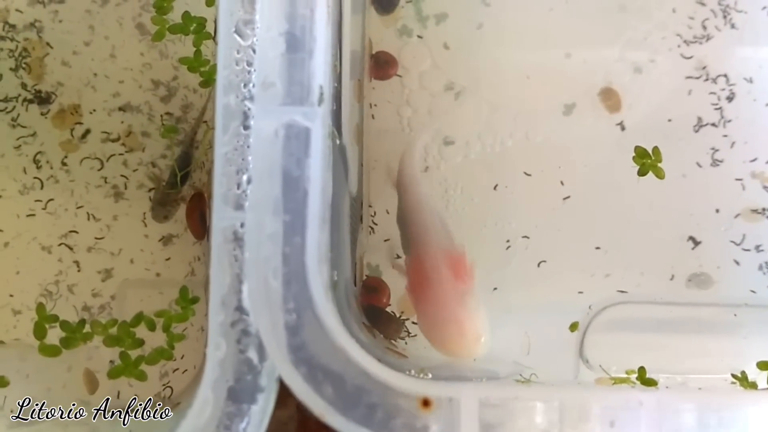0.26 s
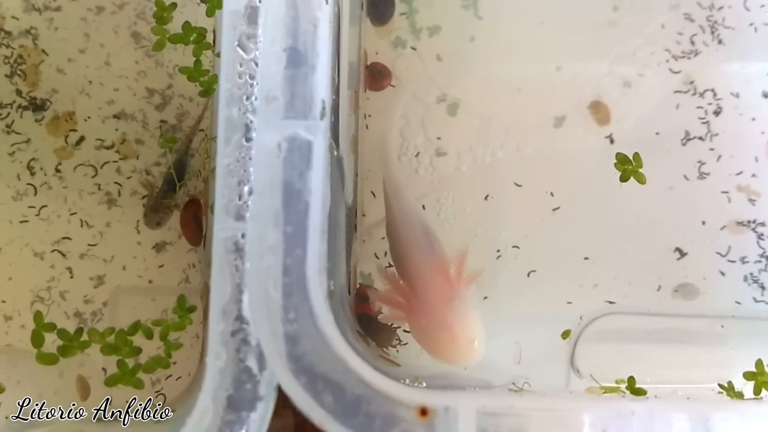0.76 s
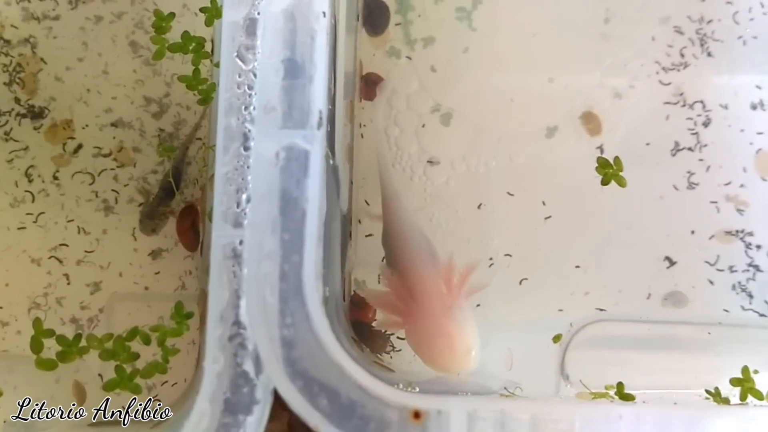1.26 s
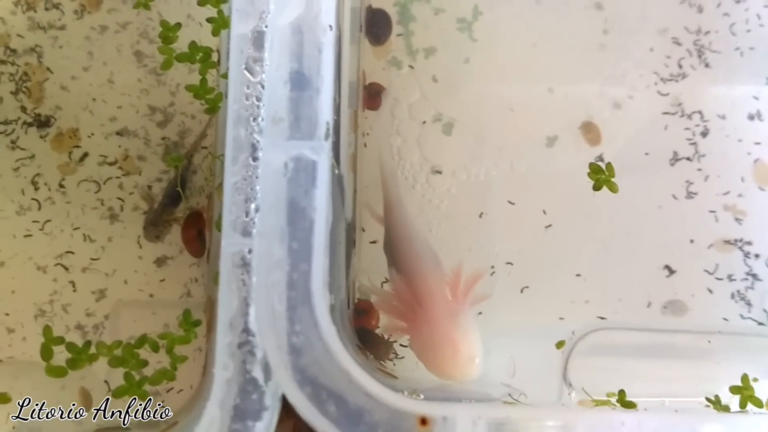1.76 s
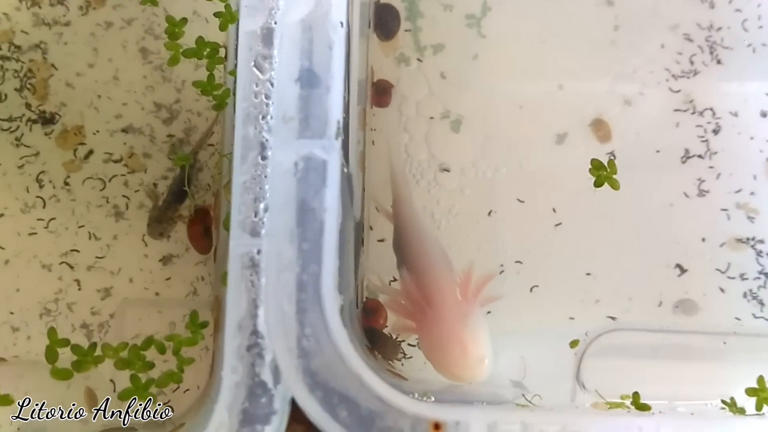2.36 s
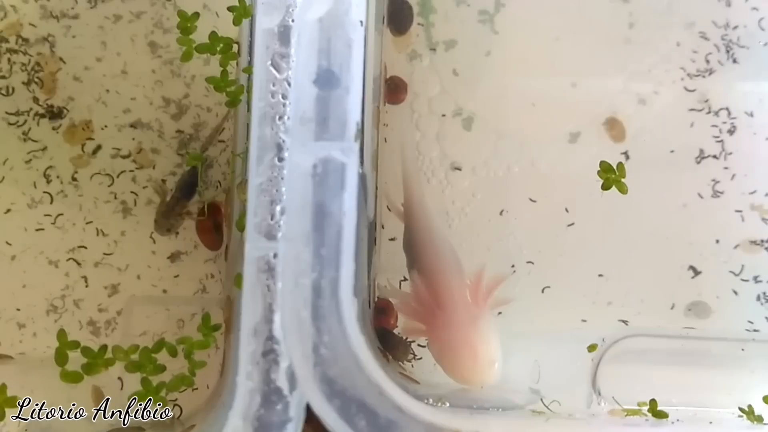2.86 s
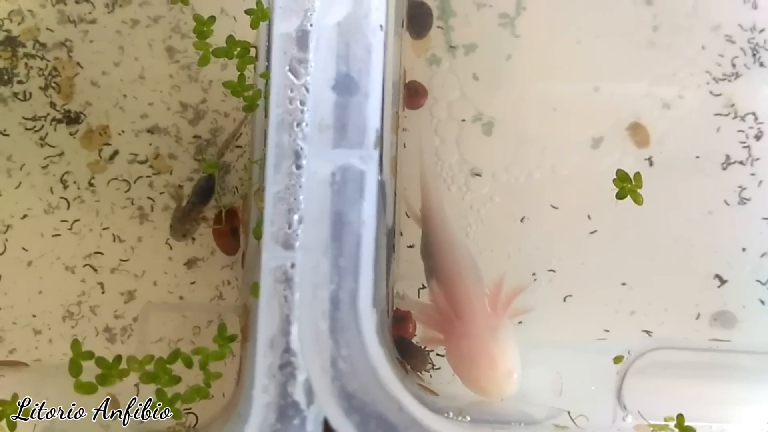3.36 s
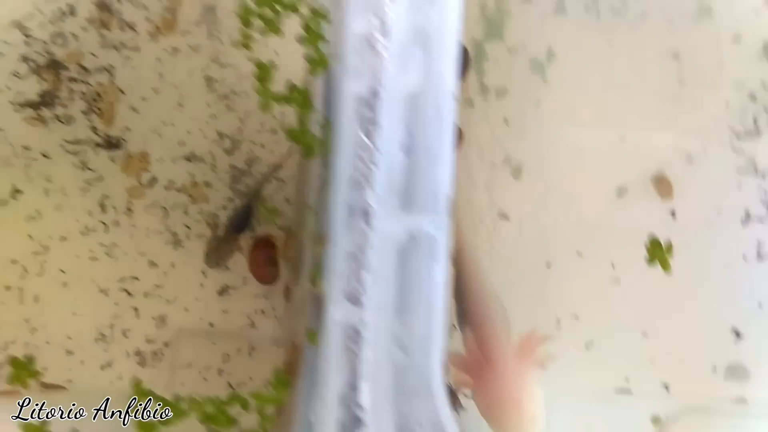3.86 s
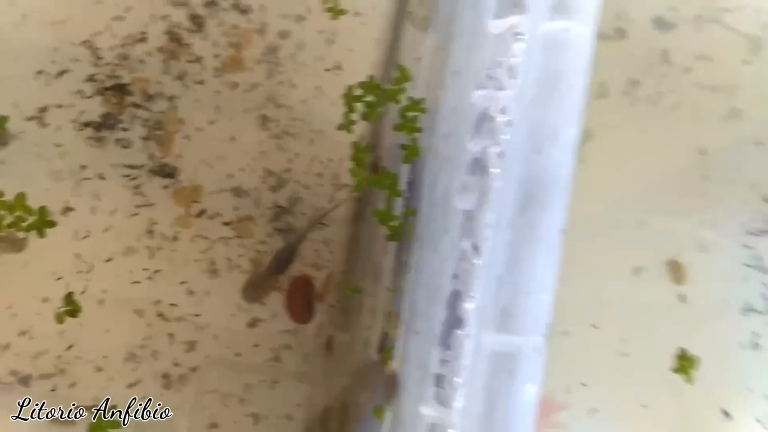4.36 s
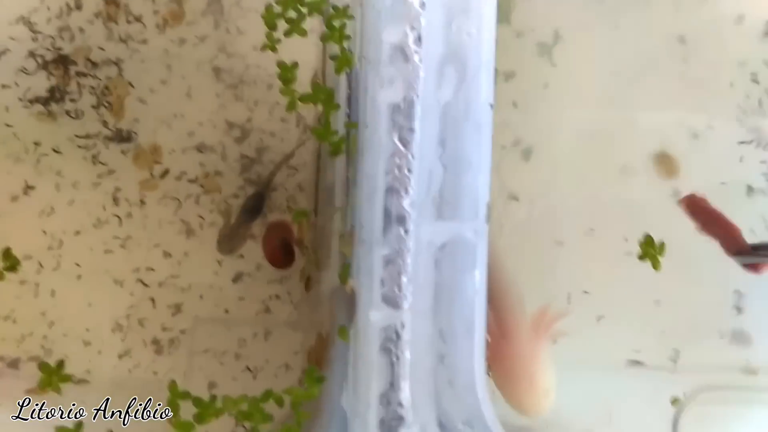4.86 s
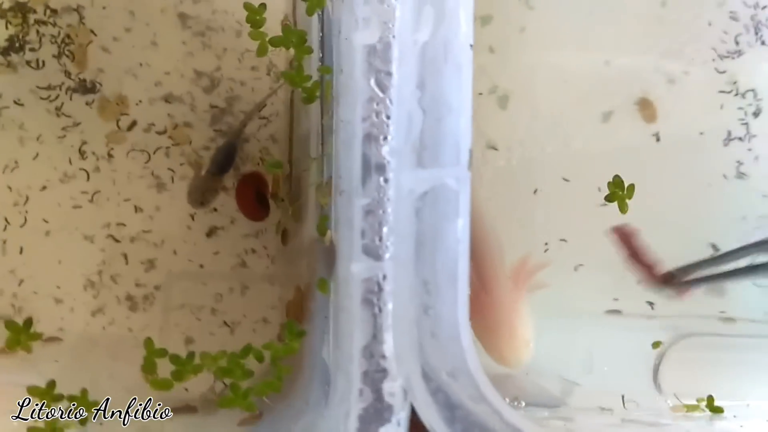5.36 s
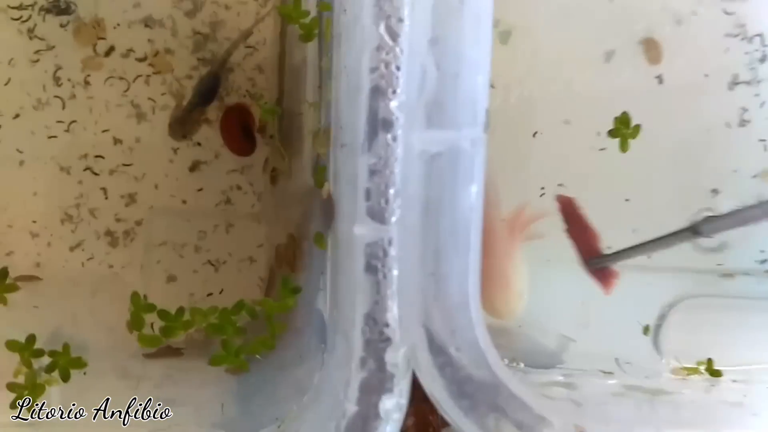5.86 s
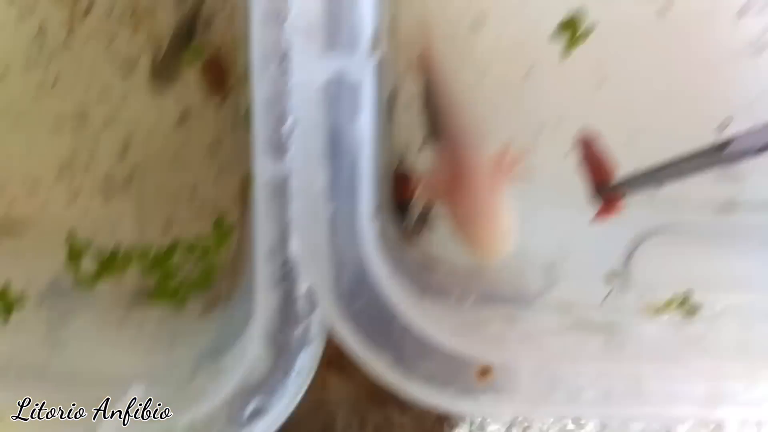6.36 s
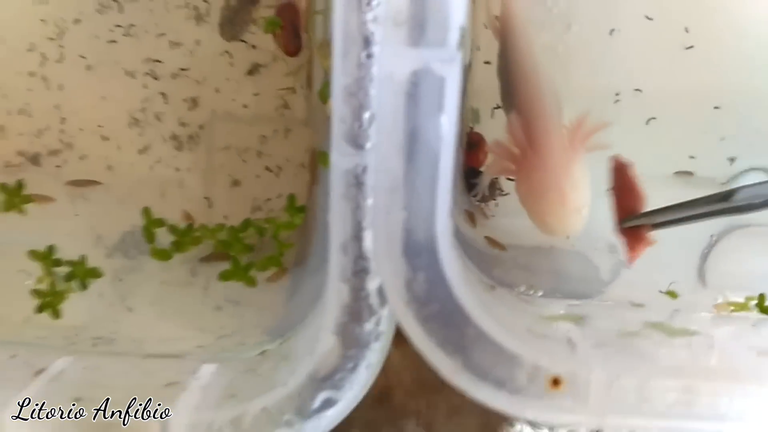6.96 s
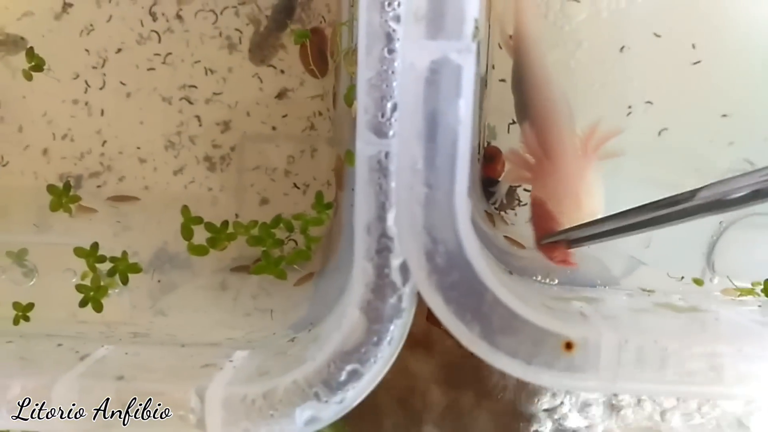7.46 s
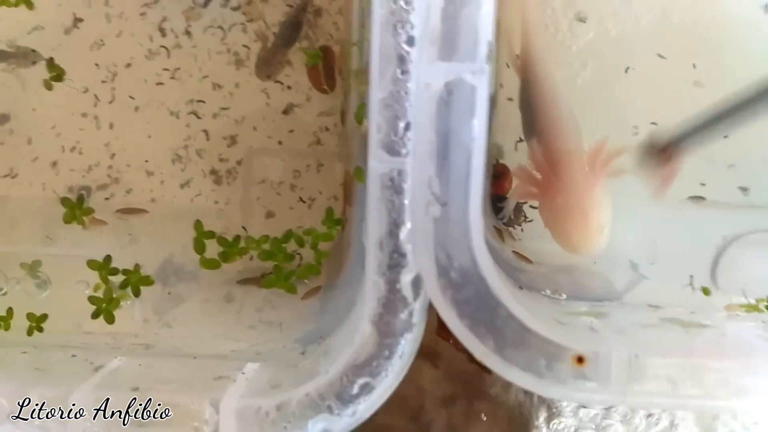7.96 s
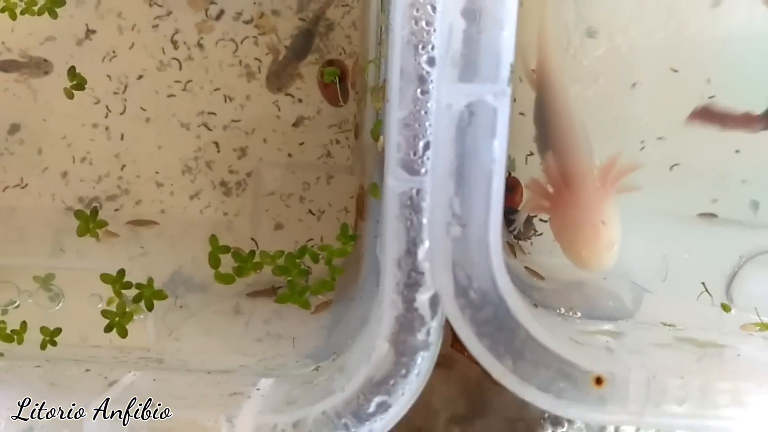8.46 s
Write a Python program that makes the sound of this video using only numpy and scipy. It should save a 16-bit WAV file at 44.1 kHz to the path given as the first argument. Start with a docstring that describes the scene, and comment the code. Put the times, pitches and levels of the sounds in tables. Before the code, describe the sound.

Close, uneven trickling fills the stretch: midrange gurgles, bright watery plinks and a thin fizzing spray, with short reflections from tank walls and a small room. The pump and still air are barely audible. The microphone is bumped softly early on; a hard object clacks rapidly against the tank before the halfway point, then three muffled handling thuds occur, the second strongest. The water never stops.

```python
"""From start to end, water trickles from a filter return into an aquarium while the pump hums in still air.
Bubbles gulp in the outlet's air pocket and plink on the surface (ringing tones); spurts of the stream throw
a splattering spray (crowds of tiny ringing bubbles). In the first second, the hand that holds the microphone
bumps it (low thuds). Near 3.6 s something hard knocks on the tank in a short chatter (noise and ringing tones).
Three more bumps follow, near 4.4, 5.2 and 7.5 s."""
import sys
import numpy as np
from scipy import signal
from scipy.fft import rfft, irfft
from scipy.io import wavfile
from scipy.ndimage import uniform_filter1d

SR = 44100
rng = np.random.default_rng(int(sys.argv[2]) if len(sys.argv) > 2 else 0)


def wav_record(signal):
    """Record a signal, one row per channel, as 16-bit PCM in the file named by sys.argv[1]."""
    frames = np.transpose(np.atleast_2d(signal))
    bounded = np.clip(frames, -1, 1)
    # unit amplitude maps onto the largest positive 16-bit level
    quanta = np.round(bounded * 32767).astype(np.int16)
    wavfile.write(sys.argv[1], SR, quanta)


N = 384552
T = np.arange(N) / SR  # time in seconds
TOP_HZ = 9900  # top of the audible band here

# Hum of the pump. Each row: pitch in Hz, level in dB.
HUM = [(100, -82), (150, -86), (250, -91.5), (300, -88)]
# Tone colour of the still air in the room. Each row: frequency in Hz, relative level in dB.
AIR_COLOUR = [(25, -5.5), (60, -4), (100, -1), (200, -0.5), (400, -3.5), (510, -1), (600, 0.5), (1500, -37),
              (5000, -6), (10000, -26.5)]
# Bumps of the hand. Each row: start in seconds, level in dB, pitch in Hz, left minus right in dB.
BUMPS = [(.828, -60, 62, 20), (4.362, -58, 64, 20), (5.222, -52, 76, 18), (7.535, -61, 70, -12)]
# Contacts of the knock. Each row: start in seconds, strength in dB.
KNOCK_CONTACTS = [(3.599, -4), (3.604, -3.5), (3.643, -10), (3.662, -12.5), (3.713, -12), (3.736, -14)]
# Tones the knocked thing rings with. Each row: pitch in Hz, relative level in dB,
# time to fade by 60 dB in seconds, left minus right in dB.
KNOCK_MODES = [(241, -24, .08, 9), (502, -17, .15, 0), (690, -1, .1, 3), (2050, -1, .03, -1),
               (2562, -4, .05, -8), (3205, -2, .04, 9), (3305, 4, .062, -11), (4290, -1.5, .045, 5),
               (5082, 0, .04, 7), (5451, 2.5, .05, 16), (6800, -4.5, .035, 9.5), (9200, -17, .04, 11)]
# Tone colour of the knock's crack. Each row: frequency in Hz, relative level in dB.
CRACK_COLOUR = [(60, -22), (220, -10), (400, -20.5), (750, 5.5), (1100, -7.5), (1800, 3.5), (4800, 0),
                (6800, -7), (7800, -59)]
# Strength of the stream, which drives gurgle, spray and lesser gulps. Each row: time in seconds, level in dB.
FLOW = [(0.0, -45.5), (0.62, -43.5), (0.8, -47.5), (1.4, -43), (1.9, -46.5), (2.55, -41.5), (3.12, -45.5),
        (3.3, -42.5), (3.6, -41.5), (3.85, -48.5), (4.05, -45.5), (4.55, -49), (4.72, -46.5), (5.0, -40),
        (5.35, -45), (5.9, -44.5), (6.05, -41.5), (6.35, -43.5), (6.72, -40.5), (7.08, -44.5), (7.22, -40),
        (7.65, -40), (7.95, -42.5), (8.7, -44)]
# Fine splatter in the treble. Each row: time in seconds, level in dB.
SPLATTER_LEVEL = [(0, -58.5), (0.3, -67), (1.2, -60.5), (1.8, -62.5), (3.1, -61), (4.5, -63), (5.55, -61),
                  (6.2, -57), (6.4, -67), (7.27, -58), (8.7, -60.5)]
# Tone colour of the splatter. Each row: frequency in Hz, relative level in dB.
SPLATTER_COLOUR = [(1200, -13), (2200, -4.5), (3000, 2), (4300, 1.5), (5200, -4), (6000, 2.5), (7000, -1.5),
                   (8000, -19), (8700, -13.5), (10000, -33)]
# Tone colour of the spray. Each row: frequency in Hz, relative level in dB.
SPRAY_COLOUR = [(600, -22), (980, 8), (1190, -7.5), (1500, 10), (1850, 3.5), (2350, 8.5), (3600, -1.5),
                (5000, -5), (7000, -6.5), (9000, -43)]
# Modes (natural tones) of the outlet's air pocket. Each row: pitch in Hz, spread of pitch in Hz,
# relative level in dB.
POCKET_MODES = [(782, 30, 0), (1470, 80, -1), (2590, 170, -9)]
# Extra level of the pocket's highest mode. Each row: time in seconds, lift in dB.
TOP_MODE_LIFT = [(0, 4), (5.8, -1), (6.7, 4), (8.7, 9.5)]
# Loudest plinks on the surface. Each row: time of the peak in seconds, level in dB, pitch in Hz.
PLINKS = [(0.006, -34, 5320), (0.258, -35.5, 2590), (0.375, -34, 2800), (0.677, -31, 6980),
          (0.758, -32, 4430), (0.974, -28.5, 4520), (1.236, -29.5, 7420), (1.33, -31, 5470),
          (1.534, -32.5, 6050), (1.715, -37, 6730), (1.790, -32, 2960), (2.037, -32.5, 6650),
          (2.144, -42.5, 3100), (2.453, -28, 2590), (2.524, -30.5, 2340), (2.932, -30, 5940),
          (3.735, -30.5, 4290), (3.973, -37.5, 3600), (4.01, -33, 4010), (4.197, -29.5, 2430),
          (4.468, -32.5, 6180), (4.472, -41, 3060), (4.78, -33.5, 2140), (5.232, -29.5, 6960),
          (5.402, -34.5, 2400), (5.417, -30, 4950), (5.418, -28, 2930), (6.01, -34, 2290),
          (6.233, -25, 2660), (6.473, -30.5, 2170), (6.613, -34.5, 2480), (6.717, -36, 2900),
          (6.797, -27, 2860), (6.974, -31, 2670), (7.027, -32.5, 2720), (7.083, -34.5, 6000),
          (7.248, -30, 2820), (7.707, -32, 2600), (7.76, -36.5, 4170), (8.083, -33, 3310),
          (8.278, -31, 2560), (8.313, -34.5, 6230)]
# Loudest gulps of the outlet. Each row: time of the peak in seconds, low mode level in dB,
# low mode pitch in Hz, upper mode level in dB.
GULPS = [(0.103, -38.5, 814, -33), (0.371, -31, 825, -31), (0.569, -36, 825, -42.5),
         (0.603, -41.5, 860, -31), (0.635, -36.5, 810, -31.5), (0.683, -35.5, 834, -27.5),
         (0.904, -64, 806, -29.5), (0.925, -57, 817, -35.5), (0.971, -38.5, 867, -34),
         (1.153, -37.5, 867, -36.5), (1.184, -36, 854, -29), (1.299, -34.5, 784, -31),
         (1.421, -40, 845, -29), (1.461, -35.5, 781, -30), (1.504, -30.5, 781, -39), (1.692, -42, 767, -30),
         (1.722, -53, 785, -23.5), (1.753, -38, 823, -32.5), (1.923, -35.5, 860, -33),
         (2.069, -44, 877, -34.5), (2.131, -37, 843, -29.5), (2.221, -46, 787, -32),
         (2.423, -34.5, 862, -36.5), (2.527, -32.5, 798, -40), (2.547, -45.5, 809, -34.0),
         (2.596, -38.5, 803, -34.5), (2.635, -47, 740, -31), (2.693, -50, 810, -32.5),
         (2.742, -40.5, 833, -33), (2.894, -32, 786, -28), (2.996, -50, 795, -31), (3.166, -41.5, 840, -33),
         (3.359, -47, 860, -34), (3.533, -38.5, 812, -35.5), (3.719, -32.5, 803, -41),
         (3.746, -42, 845, -36), (4.022, -46, 910, -34.5), (4.053, -52.5, 796, -34),
         (4.173, -45.0, 800, -35), (4.666, -31, 768, -62), (4.691, -37, 834, -62), (4.743, -31, 830, -50),
         (4.819, -37.5, 798, -36.5), (4.977, -28, 741, -26.5), (5.029, -37.5, 822, -33),
         (5.089, -34.5, 776, -39.5), (5.204, -32, 780, -50), (5.313, -44.5, 869, -32),
         (5.433, -56, 794, -34.0), (5.574, -38.5, 837, -34), (5.675, -44, 837, -37.5),
         (5.734, -43, 864, -37.0), (5.788, -33, 867, -37.5), (6.002, -40.5, 760, -31.0),
         (6.054, -28.5, 812, -35), (6.12, -33.5, 810, -45), (6.143, -28, 832, -52),
         (6.399, -34.5, 762, -39), (6.46, -35.5, 769, -39), (6.526, -32, 800, -39),
         (6.686, -32.5, 773, -36), (6.72, -40, 820, -34), (6.738, -43, 767, -33.5), (6.878, -38, 891, -49),
         (6.949, -34, 815, -35), (6.976, -41.5, 820, -38), (7.15, -30, 800, -53), (7.195, -32, 784, -35.5),
         (7.232, -33.5, 786, -42.5), (7.359, -26, 771, -39.0), (7.488, -34, 765, -44),
         (7.613, -33, 826, -36), (7.778, -32.5, 790, -30.5), (8.128, -36, 790, -34.5),
         (8.176, -35, 809, -35), (8.208, -34.5, 792, -34.5), (8.248, -31.5, 791, -28),
         (8.494, -37.5, 816, -29), (8.524, -62, 810, -28), (8.554, -45, 788, -39)]
# How the water reaches the two microphone ports. Each row: frequency in Hz, left minus right in dB,
# phase lead of the left in radians.
PORTS = [(594, 1, -.3), (790, 3, -.2), (990, 5.5, -.7), (1160, -1, -1.8), (1350, -5, -.8),
         (1590, -7.5, -1.5), (1850, -6, -.2), (2580, -2, -.3), (2950, 2.5, -1.6), (3870, -1, .5),
         (5800, 2, 2.2)]


def undb(db):
    """Turn decibels into a plain gain."""
    return 10 ** (np.asarray(db) / 20)


def level(x, db):
    """Scale a sound so that its average (rms) level is the given dB."""
    return x * undb(db) / np.sqrt(np.mean(x ** 2))


def pan(db):
    """Left and right gains, as a column, for a left minus right difference in dB."""
    return undb(np.array([[db], [-db]]) / 2)


def stereo_noise(count=N, apart=1):
    """Noise with a part shared by both sides and a part of each side's own, scaled by `apart`."""
    return rng.standard_normal(count) + apart * rng.standard_normal((2, count))


def add(out, s, sound):
    """Mix a sound in at a time in seconds."""
    i = int(np.clip(s * SR, 0, N))
    out[..., i:i + sound.shape[-1]] += sound[..., :N - i]


def on_log_axis(hz, points, axis=1):
    """One column of a frequency table, read between its rows."""
    points = np.array(points, float)
    return np.interp(np.log(hz + 1), np.log(points[:, 0]), points[:, axis])


def colour(x, points, size=2048):
    """Filter with the given (Hz, dB) response, built so that nothing sounds ahead of its cause."""
    gains = undb(on_log_axis(np.fft.rfftfreq(size, 1 / SR), points))
    # folding the cepstrum (spectrum of the log spectrum) forward in time gives minimum phase
    cepstrum = irfft(np.log(gains))
    cepstrum[1:size // 2] *= 2
    cepstrum[size // 2 + 1:] = 0
    response = irfft(np.exp(rfft(cepstrum)))
    return np.apply_along_axis(signal.oaconvolve, -1, x, response)[..., :N]


def highpass(x, hz, order=4):
    """Weaken what lies below a frequency."""
    return signal.sosfilt(signal.butter(order, hz, "high", fs=SR, output="sos"), x)


def lowpass(x, hz, order):
    """Weaken what lies above a frequency."""
    return signal.sosfilt(signal.butter(order, hz, fs=SR, output="sos"), x)


def ring(hz, rise, cycles, glide):
    """A complex tone that swells over `rise` cycles, dies over `cycles` and bends its pitch by `glide`; peak 1."""
    turn = np.arange(int((7 * cycles + rise) * SR / hz) + 2) * hz / SR  # time counted in cycles
    shape = (1 - np.exp(-(turn / rise) ** 2)) * np.exp(-turn / cycles)
    pitch = hz * (1 + glide * (np.tanh(turn / cycles / 2) - np.tanh(rise / cycles)))
    return shape / shape.max() * np.exp(2j * np.pi * np.cumsum(pitch) / SR)


def place(tone, pan_db, lead):
    """A complex tone at the two ports, with its own level (dB) and phase (radians) difference."""
    turned = np.exp(.5j * lead * np.array([[1], [-1]]))
    return (tone * pan(pan_db) * turned).imag


def echoes(x, t60, wet_db, gap_s, dull_hz):
    """Diffuse reflections as fading noise, different at each port and duller than the direct sound."""
    t = T[:SR // 2]
    fade = undb(-60 * t / t60) * (1 - np.exp(-(t / gap_s) ** 2))
    tail = rng.standard_normal((2, len(t))) * fade
    tail *= undb(wet_db) / np.sqrt(np.sum(tail ** 2) / 2)
    return signal.oaconvolve(x, lowpass(tail, dull_hz, order=1), axes=1)[:, :N]


def pump_and_air(air_db=-74.0, apart=0.64):
    """Mains hum of the pump as steady tones, wavering slightly, over the room's still air as soft noise."""
    hum = 0
    for hz, db in HUM:
        waver = np.interp(T, np.linspace(0, T[-1], 60), np.cumsum(rng.standard_normal(60)))
        hum = hum + undb(db) * np.sqrt(2) * np.sin(2 * np.pi * hz * T + waver * hz / 400)
    air = level(colour(stereo_noise(apart=apart), AIR_COLOUR), air_db)
    return pan(2.3) * (hum + air)


def bumps(thud_db=1, thud_hz=150):
    """Dull thuds through the casing, mostly at one port; the harder ones stir a higher mode more strongly."""
    out = np.zeros((2, N))
    hardest = max(row[1] for row in BUMPS)
    for s, db, hz, pan_db in BUMPS:
        size = undb(db - abs(pan_db) / 4)
        low = place(ring(hz, .9, 1.1, -.2), pan_db, 0)
        high = place(ring(thud_hz, 0.98, 0.64, 0), pan_db, 0)
        add(out, s, size * low)
        add(out, s, size * undb(thud_db + db - hardest) * high)
    return out + echoes(out, t60=0.41, wet_db=-10.0, gap_s=0.019, dull_hz=2010)


def knock(ring_db=-22.5, crack_db=-30, crack_t60=0.089):
    """A hard thing chatters against the tank: each contact cracks (noise) and rings briefly (fading tones)."""
    out, contact, t = np.zeros((2, N)), np.zeros(N), T[:SR // 3]
    hiss = level(colour(stereo_noise(), CRACK_COLOUR), crack_db)
    for s, db in KNOCK_CONTACTS:
        add(contact, s, undb(db - 60 * t / crack_t60) * np.tanh(t / 0.00037))
        lucks = rng.standard_normal(len(KNOCK_MODES))
        for (hz, mode_db, t60, pan_db), luck in zip(KNOCK_MODES, lucks):
            # lighter contacts catch the modes unevenly
            fade = undb(ring_db + db * (2.76 + 0.32 * luck) + mode_db - 60 * t / t60)
            onset = 1 - np.exp(-t / 0.0014)
            # counting phase from the scene's start lets each contact feed the ring already there
            tone = np.sin(2 * np.pi * hz * (t + s))
            add(out, s, pan(pan_db) * fade * tone * onset)
    # while it chatters, the shifting contact roughens the ring
    chatter = level(lowpass(rng.standard_normal((2, N)), 130, order=2), -7)
    out = out * (1 + chatter) + contact * hiss
    return out + echoes(out, t60=.3, wet_db=-14, gap_s=.025, dull_hz=7000)


def flow_db(s):
    """Strength of the stream in dB at the given times."""
    return np.interp(s, *np.transpose(FLOW))


def uneven_times(per_s, stray_turns=1.5):
    """Moments at a mean rate, each straying from its turn."""
    count = int(per_s * N / SR)
    turns = np.arange(count) + stray_turns * rng.uniform(-1, 1, count)
    return turns / per_s % (N / SR)


def spurts(gulp_rows, plink_rows, scatter_db=5.5, splash_s=.010, splash_db=0.5):
    """Rows (s, size): the stream breaks up unevenly and splashes just before and after every bubble."""
    s = uneven_times(80)
    db = scatter_db * np.sqrt(6) * (rng.random(len(s)) - rng.random(len(s)))
    bubbles = np.r_[gulp_rows[:, 0], plink_rows[:, 0]]
    sizes = np.full(len(bubbles), undb(splash_db))
    splashes = [np.c_[bubbles + lag, sizes] for lag in (-splash_s, splash_s / 2)]
    return np.vstack([np.c_[s, undb(db)], *splashes])


def cloud(breaks, pitches, cycles, glide, spread_s, scatter_db, largest_db, count):
    """Each spurt sheds `count` brief bubbles, each at its own moment and place, up to a largest size."""
    out, rings = np.zeros((2, N)), []
    for hz, (life, bend) in zip(pitches, rng.standard_normal((len(pitches), 2))):
        tone = ring(hz, cycles / 2, cycles * undb(4 * life), glide * (1 + bend))
        # small bubbles are brief, so they peak higher for the same energy
        rings.append(tone * np.sqrt(hz))
    for s, size in breaks:
        lags = rng.exponential(spread_s, count)
        picks = rng.integers(len(rings), size=count)
        for lag, k, (loud, side, lead) in zip(lags, picks, rng.standard_normal((count, 3))):
            gain = min(size * undb(scatter_db * loud), undb(largest_db))
            add(out, s + lag, gain * place(rings[k], 4 * side, lead * pitches[k] / 1800))
    return level(out, 0)


def splatter(breaks, fizz_db=-11):
    """Each spurt bursts into fine drops, each a tiny ringing bubble, over a faint fizz of noise."""
    drops = cloud(breaks, np.linspace(2400, 9200, 150), cycles=6.5, glide=.05, spread_s=.007,
                  scatter_db=6.5, largest_db=18, count=12)
    fizz = level(stereo_noise(), fizz_db)
    loudness = undb(np.interp(T, *np.transpose(SPLATTER_LEVEL)))
    return level(colour(drops + fizz, SPLATTER_COLOUR), 0) * loudness


def spray(breaks, wash_db=-10, spray_db=-8.5):
    """Little ringing bubbles of all sizes crowd over the surface, many bending up in pitch."""
    out = cloud(breaks, np.geomspace(950, 5200, 200), cycles=5, glide=.1, spread_s=.008,
                scatter_db=6, largest_db=14, count=16)
    # the jet itself, drops too fine to tell apart, makes a soft wash that swells with the spurts
    swell = np.sqrt(uniform_filter1d(np.mean(out ** 2, 0), SR // 25) + .2)
    wash = colour(stereo_noise(), [(900, 0), (8500, -6)])
    return level(colour(out + level(swell * wash, wash_db), SPRAY_COLOUR), spray_db)


def gurgle(breaks, rise=4.0, cycles=9, spread_s=.012, scatter_db=3, gurgle_db=-4.5):
    """Each spurt traps small bubbles that ring near the modes of the air pocket, each at its own pitch."""
    out, count = np.zeros(N), len(breaks)
    top_lift = np.interp(breaks[:, 0], *np.transpose(TOP_MODE_LIFT))
    lifts_db = np.zeros(count), np.zeros(count), top_lift
    for (mode_hz, spread_hz, mode_db), lift_db in zip(POCKET_MODES, lifts_db):
        rings = [ring(mode_hz + spread_hz * off, rise, cycles * undb(2 * life), 0.018 * bend)
                 for off, life, bend in rng.standard_normal((150, 3))]
        lags = rng.exponential(spread_s, count)
        picks = rng.integers(len(rings), size=count)
        levels_db = mode_db + lift_db + scatter_db * rng.standard_normal(count)
        for (s, size), db, lag, k in zip(breaks, levels_db, lags, picks):
            add(out, s + lag, size * undb(db) * rings[k].imag)
    return level(highpass(out, 700, order=8), gurgle_db)


def drips(rows, snap_db=-7, t60=0.0097, above_hz=3600):
    """The highest plinks come from drops that snap (a tick of noise) on the surface as they land."""
    out, t = np.zeros((2, N)), T[:SR // 20]
    for s, db, hz in rows:
        if hz > above_hz:
            snap = stereo_noise(len(t), apart=.5)
            add(out, s - .002, undb(db + snap_db - 60 * t / t60) * snap)
    return signal.sosfilt(signal.butter(3, (3800, 7300), "band", fs=SR, output="sos"), out)


def plinks(rows, gain_db=0.1, rise=2.6, cycles=5, chirp_hz=550, brood_db=-13, brood_s=0.0043, count=5):
    """Bubbles chirp, mostly upward, at the surface, each breaking into a brood of lesser ones of nearby pitch."""
    out = np.zeros((2, N))
    for (s, db, hz), chance in zip(rows, rng.standard_normal((len(rows), count + 1, 5))):
        for k, (life, bend, side, lag, off) in enumerate(chance):
            when, bubble_db, pitch = s, db, hz
            if k > 0:  # one of the brood
                when, bubble_db, pitch = s + brood_s * (.5 + lag), db + brood_db, hz * undb(1.5 * off)
            glide = chirp_hz / pitch * undb(2 * bend)
            tone = ring(min(pitch, TOP_HZ), rise, cycles * undb(2 * life), glide)
            start = when - abs(tone).argmax() / SR
            add(out, start, undb(bubble_db + gain_db) * place(tone, 2 * side, lag / 2))
    return out


def all_gulps(per_s=12, low_db=3, upper_db=1.5, scatter_db=3):
    """The loud gulps, and lesser ones between them that follow the flow, their pitches leaning upward."""
    s = uneven_times(per_s)
    low_luck, pitch_luck, upper_luck = rng.standard_normal((len(s), 3)).T
    low_hz, low_spread, _ = POCKET_MODES[0]
    lesser = np.c_[s,
                   flow_db(s) + low_db + scatter_db * low_luck,
                   low_hz + low_spread * (pitch_luck + pitch_luck ** 2 / 2),
                   flow_db(s) + upper_db + scatter_db * upper_luck]
    # a loud gulp takes all the air, so no lesser one comes close to it
    free = abs(s[:, None] - np.array(GULPS)[:, 0]).min(1) > .028
    return np.vstack([GULPS, lesser[free]])


def gulps(rows, upper_db=-1.0, low_cycles=9, upper_cycles=7.54, slosh_db=-10, slosh_s=.013):
    """Water closes the air pocket, ringing its two lowest modes, then sloshes back and rings it off pitch."""
    out, rise, detune = np.zeros((2, N)), 4.6, .045
    upper_hz, upper_spread, _ = POCKET_MODES[1]
    for (s, db1, hz1, db2), chance in zip(rows, rng.standard_normal((len(rows), 2, 7))):
        low = db1, hz1, low_cycles
        upper = db2 + upper_db, upper_hz + upper_spread * chance[0, 0], upper_cycles
        for (db, hz, cycles), (_, life, bend, side, lead, late, off) in zip((low, upper), chance):
            tone = ring(hz, rise, cycles * undb(2 * life), detune * bend / 2)
            start = s - abs(tone).argmax() / SR
            add(out, start, undb(db) * place(tone, side, lead / 2))
            slosh = ring(hz * (1 + detune * off), rise, cycles, detune / 2)
            slosh_start = start + slosh_s * undb(2 * late)
            add(out, slosh_start, undb(db + slosh_db) * place(slosh, -side, lead / 2))
    return highpass(out, 690, order=8)


def to_ports(wet):
    """The tank walls colour the way to each port: a level and phase difference at every frequency."""
    hz = np.fft.rfftfreq(N, 1 / SR)
    tilt = undb(on_log_axis(hz, PORTS) / 2) * np.exp(.5j * on_log_axis(hz, PORTS, axis=2))
    paths = np.array([tilt, 1 / tilt])
    paths /= np.sqrt(np.mean(abs(paths) ** 2, 0))
    return irfft(rfft(wet) * paths, N)


def water():
    """The flow sets gurgle and spray; bubbles and splatter join them, then tank and room reflect it all."""
    gulp_rows, plink_rows = all_gulps(), np.array(PLINKS)
    breaks = spurts(gulp_rows, plink_rows)
    stream = undb(flow_db(T)) * (gurgle(breaks) + spray(breaks))
    bubbles = gulps(gulp_rows) + plinks(plink_rows) + drips(plink_rows)
    direct = to_ports(stream + splatter(breaks) + bubbles)
    # the near walls scatter only the short waves; the pattern shifts as the hand wanders, here in a 5 s cycle
    short = highpass(direct, 1900, order=2)
    drift = 2 * np.pi * T / 5
    tank = 0
    for share in (np.cos(drift), np.sin(drift)):
        tank = tank + share * echoes(short, t60=0.056, wet_db=-5.5, gap_s=.002, dull_hz=6000)
    room = echoes(direct, t60=.4, wet_db=-11.5, gap_s=.01, dull_hz=3500)
    return direct + tank + room


def scene():
    """All sources together, the knock and bumps cleared of their deepest rumble."""
    background = pump_and_air() + highpass(bumps(), 36, order=3)
    return background + highpass(knock(), 110, order=2) + water()


def record(dry):
    """A steep low-pass filter cuts the top of the treble."""
    return signal.sosfilt(signal.ellip(8, .2, 70, TOP_HZ, fs=SR, output="sos"), dry)


dry = scene()
out = record(dry)
wav_record(out)
```